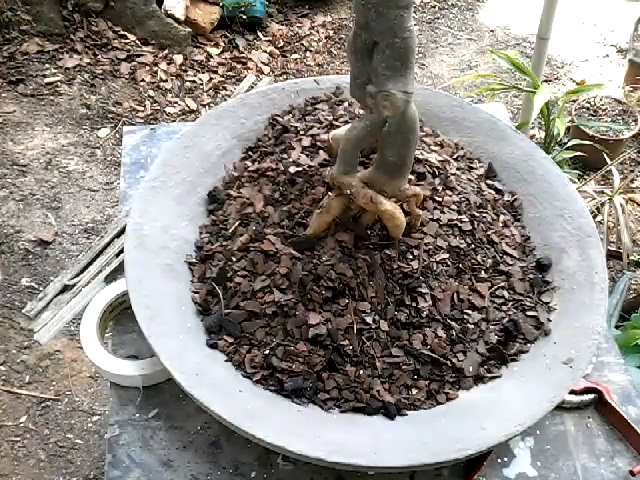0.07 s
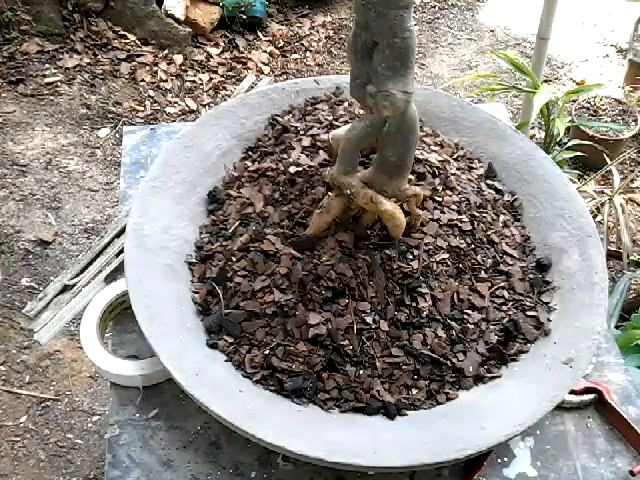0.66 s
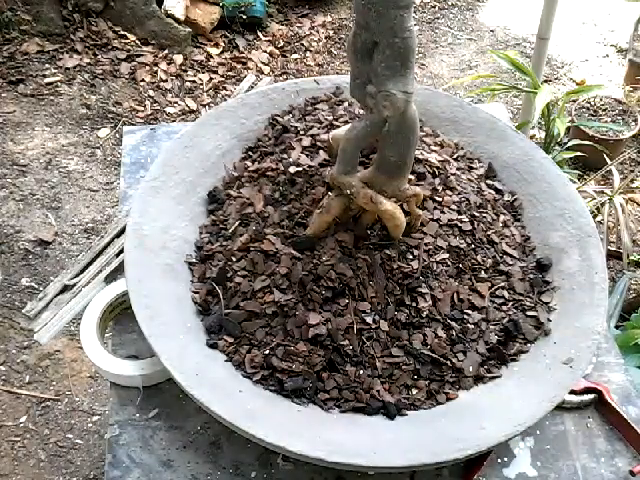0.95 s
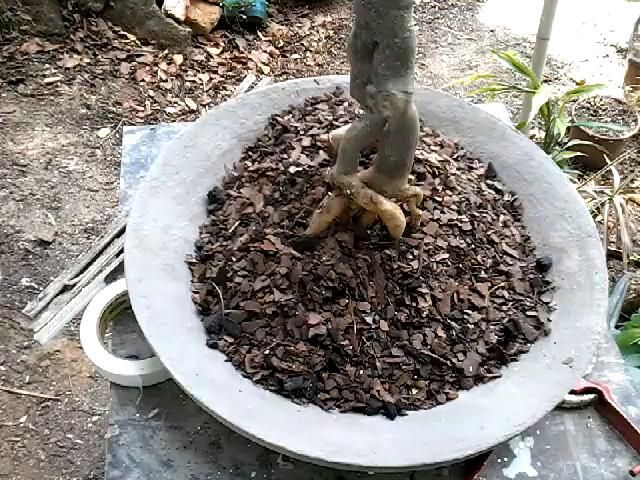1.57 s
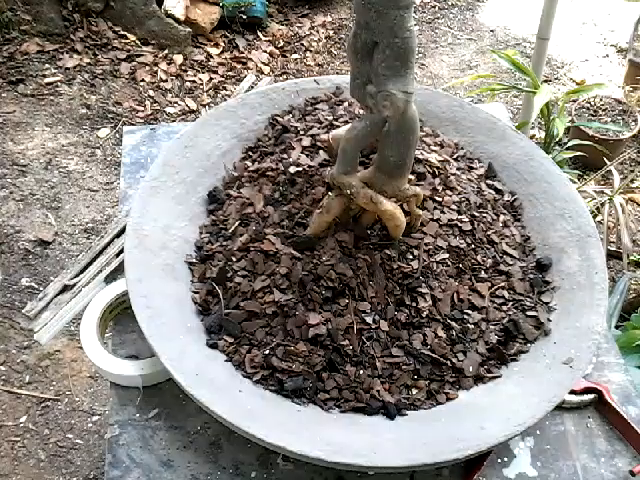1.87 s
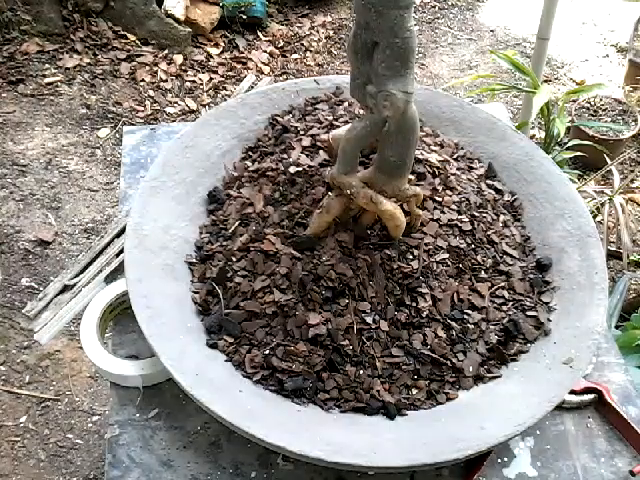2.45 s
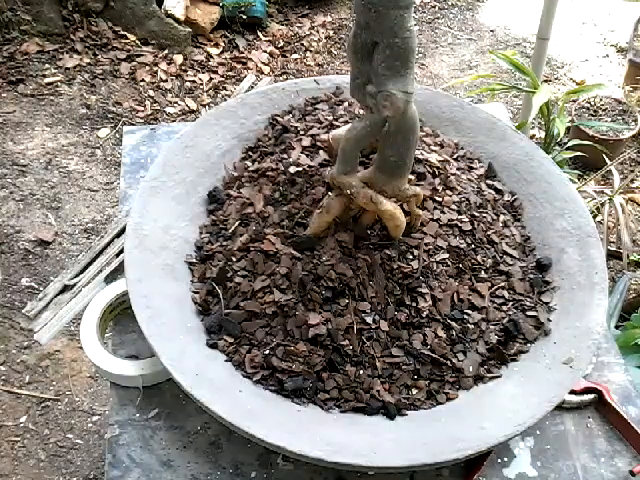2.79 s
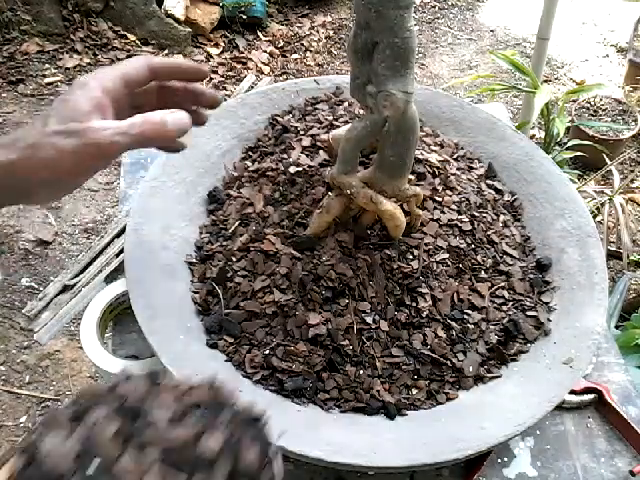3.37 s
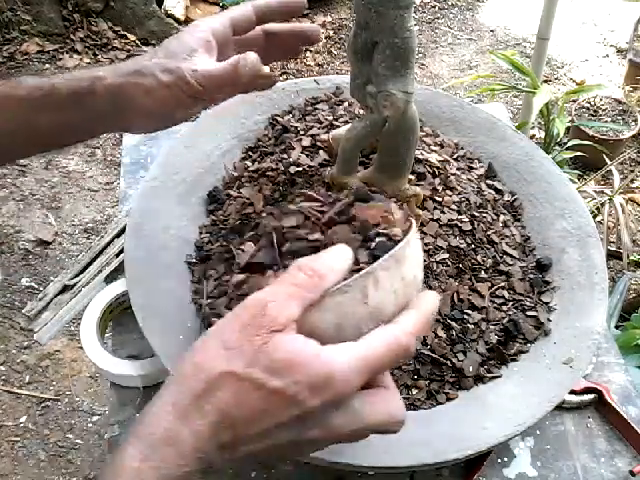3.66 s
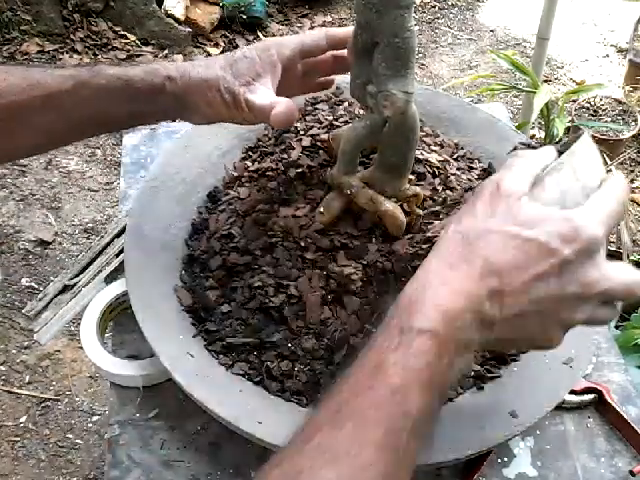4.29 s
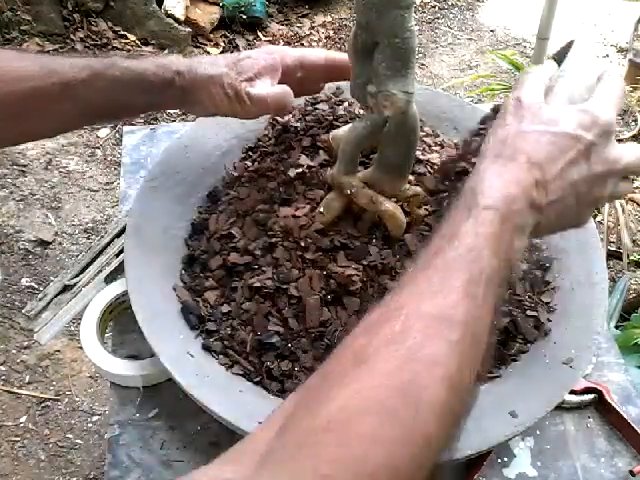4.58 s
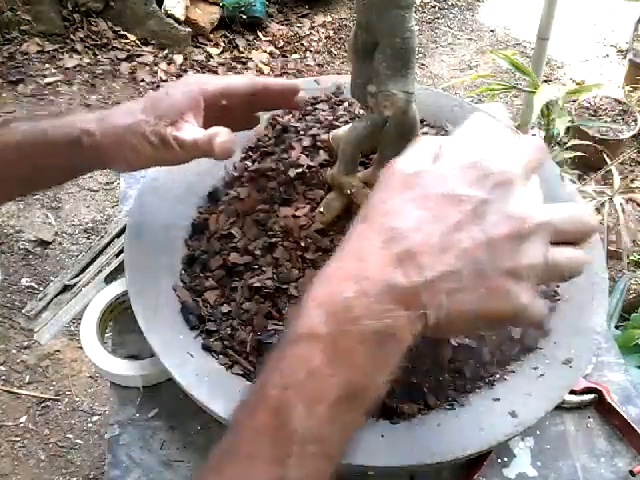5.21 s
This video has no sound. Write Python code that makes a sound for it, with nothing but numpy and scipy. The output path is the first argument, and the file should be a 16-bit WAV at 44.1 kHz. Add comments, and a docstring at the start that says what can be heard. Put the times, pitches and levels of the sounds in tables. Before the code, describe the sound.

Coarse dry chips grind and crunch as a bowl is shoved through them, knocking against a hollow tub. Scattered clacks and a thin trickling hiss follow. After a short lull, the chips are tipped into a concrete pot in short, crisp slides with small ticks and clinks. The microphone is close, in a garden with faint insects and a little wind.

```python
"""Outdoors at a tub of dry bark-and-gravel potting chips, one mono microphone close by.
A small bowl is dug into the chips, shaken level, and emptied into a concrete pot.
The tub booms hollowly under the crunch, loose chips clack, and fines trickle with a thin ringing hiss.
Faint insects sit behind, and a light breeze brushes the microphone."""
import sys
import numpy as np
from scipy import signal
from scipy.fft import rfft, irfft, next_fast_len
from scipy.io import wavfile
from scipy.ndimage import uniform_filter1d, map_coordinates

SR = 44100
rng = np.random.default_rng(int(sys.argv[2]) if len(sys.argv) > 2 else 0)


def transcribe(u):
    """Save the signal u as a 16-bit wav file named by the first command-line argument.

    u: samples, shape (n,) or (channels, n), limited to [-1, 1]; the rate is SR.
    q: integer samples, one column per channel.
    """
    v = np.clip(np.atleast_2d(u).T, -1, 1)
    q = np.round(v * 32767).astype(np.int16)
    wavfile.write(sys.argv[1], SR, q)


N = 231128

# modes of a struck chip: pitch_hz, gain_db, t60_s
CHIP_MODES = [(1030, -1.5, 0.015), (1125, -4.5, 0.052), (1244, -7.5, 0.053), (1475, 1.5, 0.016),
              (1750, 0, 0.031), (2003, 2, 0.016), (2260, -6, 0.054), (2700, -1.5, 0.02), (3180, -1, 0.028),
              (3800, -10.5, 0.014)]
# spectrum of a chip's crisp tick: frequency_hz, gain_db
CHIP_TICK_SPECTRUM = [(1500, -9.5), (3500, -4), (7300, -2.5), (9500, -8), (12000, -16.5), (16000, -18)]


def amp(db):
    """Decibels to gain."""
    return 10 ** (np.asarray(db) / 20)


def unit(x):
    """Scale to rms 1."""
    return x / np.sqrt(np.mean(x ** 2) + 1e-20)


def clock():
    """The time of each sample, in seconds."""
    return np.arange(N) / SR


def add(track, start_s, sound):
    """Mix a sound in at start_s."""
    part = track[round(start_s * SR):][:len(sound)]
    part += sound[:len(part)]


def wobble(rate):
    """A smooth random curve, rate knots a second."""
    return map_coordinates(rng.standard_normal(4096), [clock() * rate], mode="wrap")


def held(start, end, rise_s, fall_s, sag_db_per_s=0):
    """Gain that swells up to start, holds or sags, and dies away after end."""
    t = clock()
    edges = np.minimum(np.minimum((t - start) / rise_s, (end - t) / fall_s), 0)
    return np.exp(edges) * amp(-sag_db_per_s * np.clip(t - start, 0, abs(end - start)))


def flow(rows, rise_s, fall_s, sag_db_per_s):
    """Gain of overlapping (start_s, end_s, level_db) spans, added in power."""
    gains = (amp(db) * held(start, end, rise_s, fall_s, sag_db_per_s) for start, end, db in rows)
    return np.sqrt(sum(gain ** 2 for gain in gains))


def filtered(x, response):
    """x through a complex response of frequency."""
    size = next_fast_len(len(x) + 8192)
    return irfft(rfft(x, size) * response(np.fft.rfftfreq(size, 1 / SR)), size)[:len(x)]


def coloured(x, points):
    """x through a minimum-phase filter drawn by (frequency_hz, gain_db) points."""
    point_hz, db = np.transpose(points)
    hz = np.fft.rfftfreq(4096, 1 / SR)
    gain = amp(np.interp(np.log(hz + 1), np.log(point_hz), db))
    cepstrum = irfft(np.log(gain))
    half = len(cepstrum) // 2
    fold = np.r_[1, np.full(half - 1, 2), np.zeros(half)]
    impulse = irfft(np.exp(rfft(cepstrum * fold)))
    return signal.fftconvolve(x, impulse)[:len(x)]


def resonant(x, peaks):
    """x through parallel resonances of alternating sign; rms 1."""
    def response(f):
        return sum((-1) ** k * amp(db) * 1j * f * width / (hz * hz - f * f + 1j * f * width)
                   for k, (hz, width, db) in enumerate(peaks))
    return unit(filtered(x, response))


def narrow(x, hz, width_hz):
    """x through one resonance twice, for steep skirts; rms 1."""
    b, a = signal.iirpeak(hz, hz / width_hz, SR)
    return unit(signal.lfilter(b, a, signal.lfilter(b, a, x)))


def streaky(x, depth_db):
    """Narrow bands of x swell and fade at random, each for a few tenths of a second."""
    frames = dict(nperseg=4096, noverlap=3072)
    bands = signal.stft(x, **frames)[2]
    swell = uniform_filter1d(rng.standard_normal(bands.shape), 4, axis=0)
    swell = uniform_filter1d(swell, 12, axis=1)
    return signal.istft(bands * unit(amp(depth_db * unit(swell))), **frames)[1][:N]


def grains(rate, spread_db, clump_db):
    """Tiny random contacts, rate a second, uneven in size and swelling in clumps; rms 1."""
    hit = rng.random(N) < rate / SR
    size = amp(spread_db * np.minimum(rng.exponential(size=N), 4))
    sign = np.sign(rng.standard_normal(N))
    return unit(hit * size * sign * amp(clump_db * wobble(130)))


def ring(modes, t, scatter_db):
    """Damped modes, struck at new strengths every time; peak 1."""
    x = sum(amp(db + scatter_db * rng.normal() - 60 * t / t60)
            * np.sin(2 * np.pi * hz * t) * rng.choice([-1, 1]) for hz, db, t60 in modes)
    return x / np.abs(x).max()


def crack(t, spectrum, t60, tail_db, tail_t60):
    """One sharp contact, a quick chatter, then the rattle of neighbouring chips; peak 1."""
    chatter = rng.standard_normal(len(t)) * (amp(-60 * t / t60) + amp(tail_db - 60 * t / tail_t60))
    x = coloured(chatter + amp(8.5) * (t == 0), spectrum)
    return x / np.abs(x).max()


def wall_echoes(x, drift):
    """x with short echoes whose paths change as the bowl moves, so that their colour glides."""
    # nearby walls of tub and pot: delay_s, gain
    walls = [(.0011, 0.067), (.0023, 0.14), (.0037, 0.18), (.0052, .2), (.0078, 0.4)]
    t = clock()
    return x + sum(gain * map_coordinates(x, [(t - delay * (1 + drift * wobble(2))) * SR], order=2)
                   for delay, gain in walls)


def garden():
    """Soft outdoor air, a light breeze on the microphone and a thin band of insects behind."""
    # spectra of open air and of wind rumble: frequency_hz, gain_db
    air_spectrum = [(12, -66), (20, -36), (70, -7.5), (144, -7), (219, -11), (465, -18), (811, -17),
                    (1580, -20), (3170, -14), (4950, -17.5), (6360, -13), (7110, -7), (8880, -23.5),
                    (15500, -30)]
    rumble_spectrum = [(12, -24), (20, -2), (49, 0.5), (113, -8.5), (151, -6), (390, -15), (450, -12),
                       (580, -16.5), (990, -120)]
    # puffs of breeze: start_s, end_s, level_db
    gusts = [(0.98, 1.25, -58.5), (2.2, 3.0, -63.5), (3.7, 5.24, -67), (4.33, 4.7, -65.5)]
    # insect song: pitch_hz, width_hz, gain_db
    insect_bands = [(7370, 560, 5.6), (7690, 190, 10.6)]
    calm_db, buffet_db = -70.5, 2
    air = amp(-57.5) * unit(coloured(rng.standard_normal(N), air_spectrum))
    breeze = np.hypot(amp(calm_db), flow(gusts, rise_s=0.054, fall_s=0.46, sag_db_per_s=-1.5))
    breeze *= amp(buffet_db * wobble(7.8))
    rumble = breeze * unit(coloured(rng.standard_normal(N), rumble_spectrum))
    insects = amp(-64.5 + 2.2 * wobble(24)) * resonant(rng.standard_normal(N), insect_bands)
    return air + rumble + insects


def pot_bumps():
    """Soft rubbing contacts stir the low resonances of bowl and pot."""
    # bowl and hand touching the pot: peak_s, level_db, rise_s, fall_s
    touches = [(3.989, -53, 0.0076, 0.0099), (4.53, -61, 0.0064, 0.033), (4.72, -56, 0.069, 0.11),
               (4.92, -64.5, 0.037, 0.076), (5.13, -59.5, 0.037, 0.031)]
    # the pot's resonances: pitch_hz, width_hz, gain_db
    pot_resonances = [(178, 17, -0.5), (318, 95, -13), (458, 27, 3.5), (930, 1300, -6.5)]
    push = sum(amp(db) * held(s, s, rise, fall) for s, db, rise, fall in touches)
    return push * resonant(rng.standard_normal(N), pot_resonances)


def rim_taps():
    """Stray chips click and clink on the pot's rim, and the bowl rings when it touches."""
    # taps on the pot: start_s, clack_db, bowl_db, tick_db (last two re clack, trimmed below)
    taps = [(3.273, -52, -20, 8.5), (3.694, -47, -25, 15), (3.707, -39, -27, -2), (3.986, -52, -4, 8),
            (4.527, -42.5, -9, 7), (4.699, -35, 2, 7.5), (4.837, -46, -7.5, 10), (4.9057, -55, -9, 17)]
    # the bowl's modes: pitch_hz, gain_db, t60_s
    bowl_modes = [(468, 0, .17), (860, -8, .03), (3300, -2, .025)]
    # hard chips landing: start_s, pitch_hz, level_db
    clinks = [(3.905, 8000, -42), (4.228, 9500, -40.5), (4.447, 9400, -43), (4.526, 4660, -38),
              (4.586, 2270, -47), (4.906, 8380, -33)]
    out, t = np.zeros(N), np.arange(SR // 4) / SR
    for s, db, bowl_db, tick_db in taps:
        clack = ring(CHIP_MODES, t, scatter_db=2)
        bowl = ring(bowl_modes, t, scatter_db=2)
        tick = crack(t, CHIP_TICK_SPECTRUM, t60=0.02, tail_db=-20, tail_t60=0.039)
        add(out, s, amp(db) * (clack + amp(bowl_db - 7) * bowl + amp(tick_db + 2) * tick))
    clink_shape = amp(-60 * t / 0.048) * (1 - np.exp(-t / 0.0013))
    for s, hz, db in clinks:
        add(out, s, amp(db) * clink_shape * np.sin(2 * np.pi * hz * t))
    return out


def trickle():
    """Very dense fine grains hiss; narrow resonances swell and fade as the load shifts."""
    # runs of fines: start_s, end_s, level_db
    runs = [(1.08, 2.35, -48), (2.6, 2.85, -51.5), (2.92, 3.11, -50), (3.3, 3.7, -59), (3.77, 4.35, -50),
            (4.44, 4.69, -46.5), (4.85, 5.24, -55)]
    # spectrum of their hiss: frequency_hz, gain_db
    hiss_spectrum = [(500, -26.5), (1500, -17), (2300, -15.5), (2900, -9.5), (4300, -10), (6000, -6),
                     (7000, -4.5), (8000, -2.5), (8900, -9.5), (9500, -12.5), (10200, -20), (12500, -26),
                     (16000, -29)]
    # ringing in the trickle: pitch_hz, width_hz, gain_db
    ring_bands = [(2753, 270, -11), (3100, 20, -17), (3080, 1100, -31), (3690, 280, -14),
                  (4990, 110, -17.5), (6410, 160, -12), (7110, 210, -4.5), (7610, 290, -1), (7920, 270, -6),
                  (8565, 150, -6), (9760, 240, -13), (11600, 160, -22)]
    # brief thin whistles: peak_s, pitch_hz, level_db, spread_s
    whistle_notes = [(1.16, 9475, -60, 0.06), (1.25, 3035, -62, 0.28), (2.28, 9790, -54, 0.04),
                     (3.04, 3640, -59, 0.062), (3.2, 2700, -67.5, 0.35)]
    swell_db, flutter_db = 2, 1.2
    tip_s, tip_db = 3.7, -3  # the ringing drops once the bowl tips
    level = flow(runs, rise_s=0.11, fall_s=0.13, sag_db_per_s=0.5)
    fines = coloured(grains(rate=15000, spread_db=3, clump_db=1.3), hiss_spectrum)
    hiss = unit(wall_echoes(fines, drift=0.017))
    t, contacts = clock(), rng.standard_normal(N)
    ringing = sum(amp(db + swell_db * wobble(1.96) + flutter_db * wobble(7.05))
                  * narrow(contacts, hz, width) for hz, width, db in ring_bands)
    ringing *= amp(-1 + tip_db * np.clip((t - tip_s) / 0.1, 0, 1))
    whistles = sum(amp(db) * np.exp(-0.5 * ((t - s) / spread) ** 2) * narrow(contacts, hz, width_hz=30)
                   for s, hz, db, spread in whistle_notes)
    return level * streaky(amp(0.5) * hiss + ringing, depth_db=3) + whistles


def pouring():
    """Chips slide on to the heap in a dry bright rustle, with sparse crisp ticks from the big ones."""
    # one slide for each tip of the bowl: start_s, end_s, gain_db
    slides = [(3.77, 3.93, -62.5), (4.06, 4.24, -68.5), (4.44, 4.72, -67), (4.9, 4.97, -66.5),
              (5.09, 5.24, -66.5)]
    # spectrum of sliding chips: frequency_hz, gain_db
    slide_spectrum = [(150, -32), (500, -18), (1500, -14.5), (2400, -19), (3500, -13), (5500, -5),
                      (7500, 1), (9000, -5), (10500, -11), (13000, -17), (16000, -24)]
    level = flow(slides, rise_s=0.066, fall_s=0.084, sag_db_per_s=10)
    sliding = coloured(grains(rate=4400, spread_db=2, clump_db=1.1), slide_spectrum)
    rustle = unit(wall_echoes(sliding, drift=0.04))
    ticks = unit(coloured(grains(rate=220, spread_db=2.5, clump_db=1.2), CHIP_TICK_SPECTRUM))
    return level * (amp(18.5) * rustle + amp(8) * ticks)


def tub_blow(clack_db, hollow_db, tick_db):
    """One blow ticks, clacks the chips and rings the tub."""
    # the tub's hollow modes: pitch_hz, gain_db, t60_s
    tub_modes = [(660, 0, .07), (730, -9, .035), (860, -6, .045)]
    # spectrum of the contact: frequency_hz, gain_db
    tick_spectrum = [(1500, -39), (3500, -6), (5200, -7.5), (7300, 0.5), (9000, -13), (11000, -20.5),
                     (16000, -41)]
    t = np.arange(SR // 4) / SR
    clack = ring(CHIP_MODES, t, scatter_db=1.5)
    hollow = ring(tub_modes, t, scatter_db=1.5)
    tick = crack(t, tick_spectrum, t60=0.008, tail_db=-18, tail_t60=0.05)
    return amp(clack_db) * clack + amp(hollow_db) * hollow + amp(tick_db) * tick


def tub_knocks():
    """Big chips strike the tub, small ones tumble at random, and the bowl thumps it."""
    # chip strikes: start_s, clack_db, hollow_db, tick_db (last two re clack, trimmed below)
    strikes = [(0.972, -24.5, -6, -21), (1.0527, -41, 15, -4), (1.525, -35, -8, 1.5),
               (1.6743, -28.5, -13, -6.5), (1.7195, -31.5, -11, -3.5), (1.785, -35, -26, 0),
               (2.012, -38.5, 0, 2), (2.552, -36.5, -12, 1), (2.5821, -17, 0.5, -9.5),
               (2.664, -38.5, 5, -25), (2.721, -39.5, 0, -10), (2.7428, -29, -1.5, -29),
               (2.798, -34.5, -2, 2), (2.884, -25, -5.5, -3), (2.949, -38.5, 5, -3), (2.974, -37, 3.5, -19)]
    # the bowl butting the tub: start_s, thud_db, hollow_db, tick_db (last two re thud)
    thumps = [(0.264, -48.5, 2, 4), (0.902, -28, 7.5, -1), (1.792, -42, -10, -2), (1.812, -39, -9, -3),
              (2.08, -60.5, 15.5, 5), (3.028, -40, -5.5, 9.5)]
    # low modes of that thud: pitch_hz, gain_db, t60_s
    thud_modes = [(140, -17, .04), (310, 0, .045), (450, -1, .04)]
    shake_span_s, tumble_db, spread_db = (2.15, 2.85), -52, 3
    out, t = np.zeros(N), np.arange(SR // 4) / SR
    for s, db, hollow_db, tick_db in strikes:
        add(out, s, tub_blow(db, db + hollow_db - 5.5, db + tick_db + 9))
    for when, size in rng.random((6, 2)):  # small chips tumble as the bowl is shaken level
        db = tumble_db + spread_db * (2 * size - 1)
        add(out, np.interp(when, [0, 1], shake_span_s), tub_blow(db, db, db))
    # light chips cannot move much air in the bass
    out = signal.sosfilt(signal.butter(2, 386, "highpass", fs=SR, output="sos"), out)
    for s, db, hollow_db, tick_db in thumps:
        thud = ring(thud_modes, t, scatter_db=1.5) * (1 - np.exp(-t / 0.0015))
        add(out, s, amp(db) * thud + tub_blow(db - 3, db + hollow_db, db + tick_db))
    return out


def digging():
    """Chips grind along the bowl; the same contacts make the tub boom."""
    # long drags of the bowl, and chips shifting between them: start_s, end_s, boom_db, crunch_db
    drags = [(0.343, 0.631, -47.5, -45), (1.07, 1.212, -48, -43.5), (1.379, 1.587, -44, -43.5),
             (1.662, 1.764, -51, -45.5), (2.562, 2.68, -53, -51)]
    shifts = [(0.266, 0.89, -60, -54.5), (1.053, 2.026, -62, -53.5), (2.03, 3.015, -68, -60.5)]
    # hard shoves of the bowl: peak_s, boom_db, crunch_db, rise_s, fall_s
    shoves = [(0.345, -43.5, -45.5, 0.0093, 0.017), (0.9384, -32, -52, .001, 0.022),
              (0.965, -29, -31.5, 0.013, 0.026), (0.994, -40, -37.5, 0.0077, 0.035),
              (1.055, -36, -40, 0.00055, 0.043), (1.104, -30, -33, .024, 0.023),
              (1.446, -39, -31.5, 0.037, 0.033), (1.791, -49, -36, 0.026, 0.017),
              (2.885, -52, -25.5, 0.002, 0.0032), (2.896, -33.5, -56, 0.0054, 0.0025)]
    # the tub's resonances under the chips: pitch_hz, width_hz, gain_db
    tub_resonances = [(315, 60, -15), (465, 45, -11), (662, 65, 0), (800, 150, -11), (897, 45, -9),
                      (1024, 35, -12), (1231, 45, -15)]
    # spectrum of grinding chips: frequency_hz, gain_db
    crunch_spectrum = [(120, -26), (350, 1.5), (900, -3.5), (1500, 1.5), (2400, -1.5), (3300, -0.5),
                       (5000, -3.5), (7200, 1), (8500, -6), (10000, -14), (12500, -21.5), (16000, -23)]
    moves = [(held(start, end, rise_s=0.014, fall_s=0.055), dbs) for start, end, *dbs in drags]
    moves += [(held(start, end, rise_s=0.0047, fall_s=0.043), dbs) for start, end, *dbs in shifts]
    moves += [(held(s, s, rise, fall), dbs) for s, *dbs, rise, fall in shoves]
    boom_gain, crunch_gain = np.sqrt(sum(np.outer(amp(dbs), shape) ** 2 for shape, dbs in moves))
    contacts = grains(rate=7000, spread_db=2.5, clump_db=1)
    # the bowl covers more or less of the tub's mouth, so the hollow note wanders
    wander = np.cumsum(1 + 0.015 * wobble(14))
    boom = map_coordinates(resonant(contacts, tub_resonances), [wander], order=1, mode="wrap")
    crunch = unit(coloured(contacts, crunch_spectrum))
    return boom_gain * boom + crunch_gain * crunch


def scene():
    """All sources reach one close microphone, the same on both channels."""
    mono = digging() + trickle() + pouring() + tub_knocks() + rim_taps() + pot_bumps() + garden()
    return np.array([mono, mono])


def record(dry):
    """The microphone passes nothing above its band limit."""
    top_hz = 15800
    return np.array([filtered(x, lambda hz: hz < top_hz) for x in dry])


dry = scene()
out = record(dry)
transcribe(out)
```